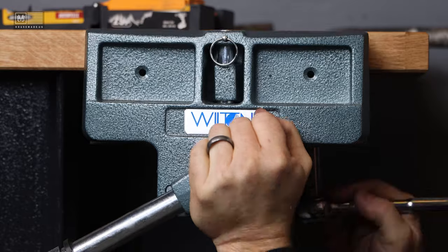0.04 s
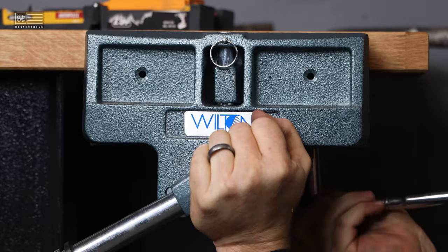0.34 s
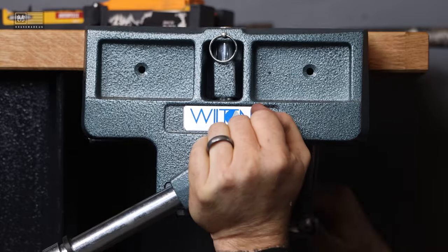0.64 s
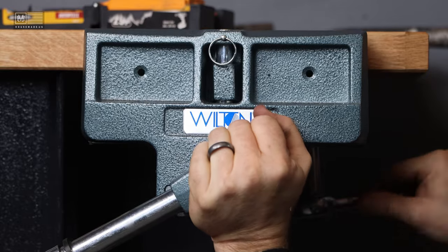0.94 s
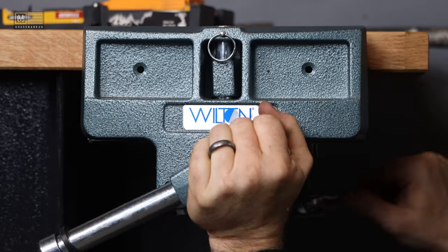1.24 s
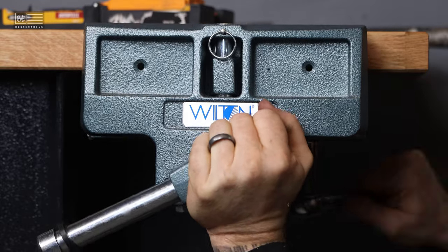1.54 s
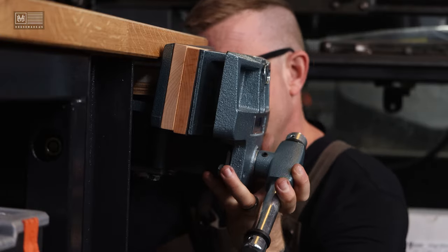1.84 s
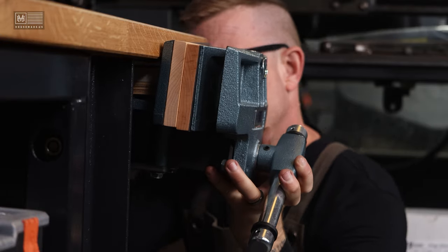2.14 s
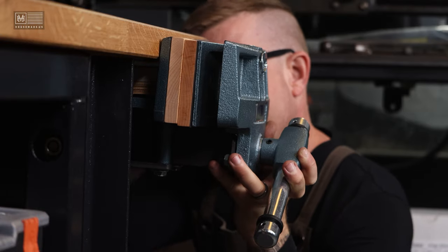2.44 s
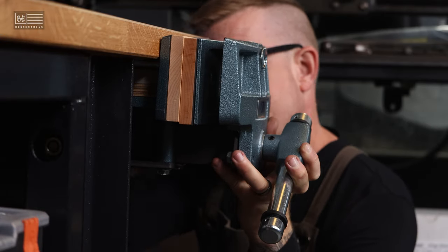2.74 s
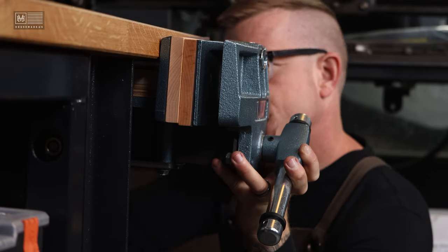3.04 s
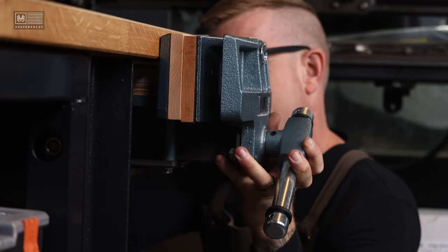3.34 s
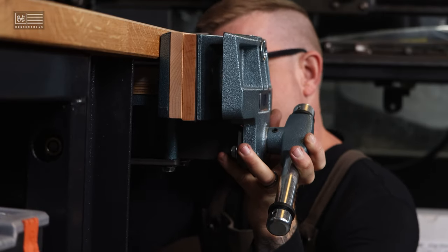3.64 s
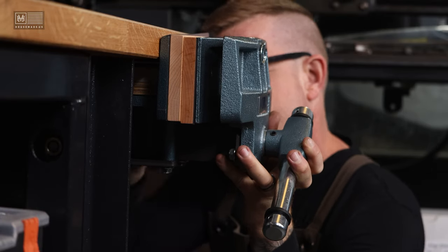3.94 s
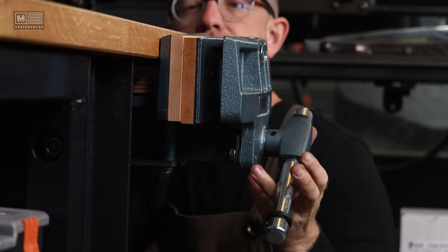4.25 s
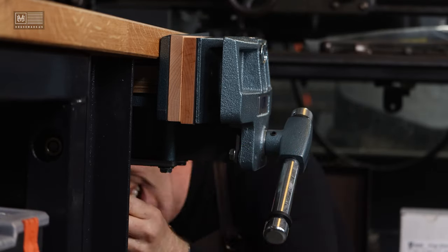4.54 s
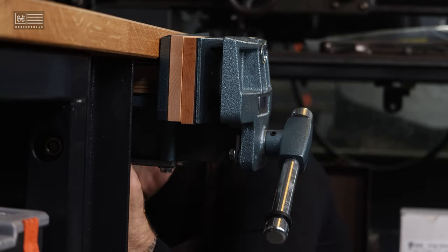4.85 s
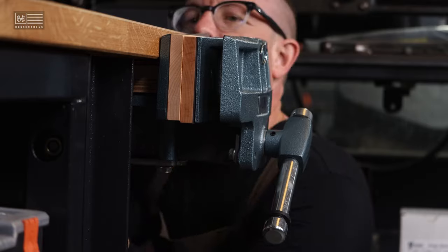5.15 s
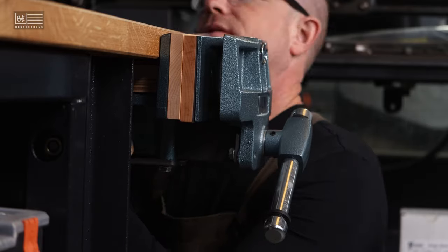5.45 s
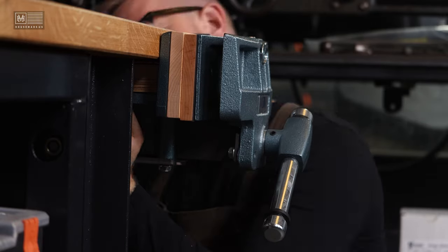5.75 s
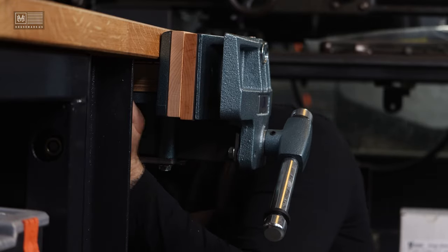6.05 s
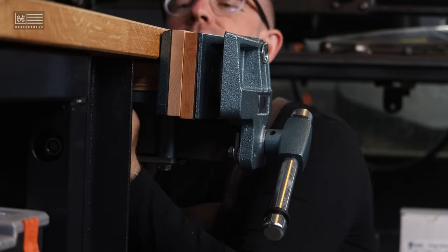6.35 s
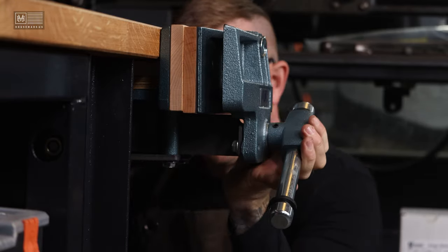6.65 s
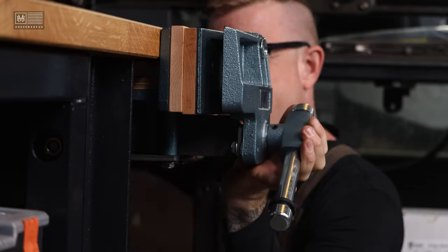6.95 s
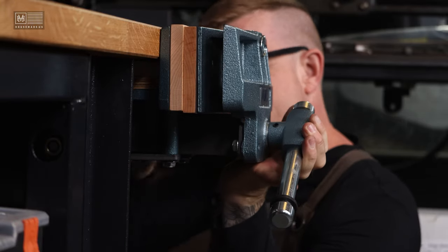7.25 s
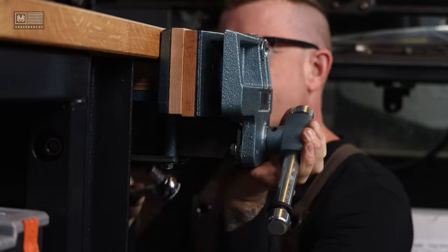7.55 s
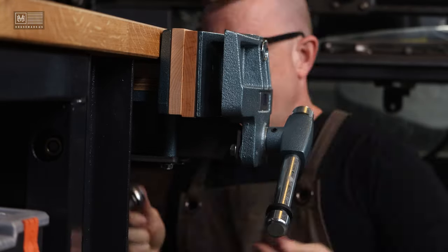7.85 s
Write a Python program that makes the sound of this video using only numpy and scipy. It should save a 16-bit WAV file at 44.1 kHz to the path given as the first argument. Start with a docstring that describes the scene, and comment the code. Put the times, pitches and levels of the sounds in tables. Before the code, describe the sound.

A ratchet wrench works on a heavy metal vise, heard close in a dry workshop with a faint, steady machine hum. A thread squeaks briefly at the very start, followed by a sharp steel knock at 0.3 seconds. Irregular clicks, short rasps and clinks continue, with a knock and light bench thump at 1.6 seconds. From about 2 to 4 seconds the ratchet runs in quick, even strokes, slightly different in tone, while loose steel rattles and rings faintly. A short lull holds a soft hand brush and a dull knock at 4.5 seconds. At about 5.1 seconds steel lets go in one bright snap with a thump, the loudest moment. Lighter ratcheting follows, with clinks near 5.7 and 6 seconds, then thins to scattered ticks. Hands and sleeves brush the iron, with a small knock near 7.9 seconds.

```python
"""A ratchet wrench bolts a heavy vise to a workbench: steel clicks and rasps in quick strokes.
The pawl ticks over its teeth, the wrench knocks on the iron, and a loose steel part rings along.
A dry thread squeaks once, hands brush the vise, jolts thump the bench, and steel lets go in one snap.
A machine hums in the room. The work is heard from the front, then the side, then under the bench."""
import sys
import numpy as np
from scipy import signal
from scipy.fft import rfft, irfft
from scipy.io import wavfile
from scipy.ndimage import uniform_filter1d

SR = 44100
rng = np.random.default_rng(int(sys.argv[2]) if len(sys.argv) > 2 else 0)


def wrap_up_sound(samples):
    """Save the sound to the file named by the first command line argument, as 16-bit audio."""
    columns = np.atleast_2d(samples).T
    # keep every value between -1 and 1, then stretch to whole-number steps
    tamed = np.clip(columns, -1, 1)
    steps = np.round(tamed * 32767).astype(np.int16)
    wavfile.write(sys.argv[1], SR, steps)


N = 357210

# wrench on iron: (time [s], bite level [dB], body [dB rel.], treble [dB rel.], length [s], mode [Hz])
WRENCH_KNOCKS = [(0.3257, -18, -12, -4, 0.0081, 3800), (0.4151, -33.5, -3, 2, 0.011, 3730),
                 (0.4367, -34, -2, 2, .007, 2700), (.4524, -32.5, -11.5, 3, 0.0058, 4200),
                 (0.9771, -25, -10, -12, 0.018, 5100), (1.1195, -25.5, -13, -15, 0.011, 5000),
                 (1.2434, -38, -3, -27, 0.0075, 3050), (1.26, -33, -7.5, -7.5, .011, 5030),
                 (1.4175, -28.5, -12, -16, 0.0066, 4700), (1.4253, -33.5, -7, 3, 0.018, 3250),
                 (1.6065, -24.5, -18.5, 4, 0.0033, 5100), (1.7001, -34, -10, -9, 0.017, 4800),
                 (1.9708, -27, -14, -9, 0.0035, 3370), (2.7322, -28.5, -15, -3, .0056, 2860),
                 (2.8084, -29, -15, 1.5, 0.0025, 2600), (2.867, -29, -23, -2.5, 0.0054, 3300),
                 (4.5438, -45, -3, -9, 0.0074, 3240), (4.7983, -35.5, -33, -2, 0.017, 5600),
                 (5.7254, -27, -19.5, -4, 0.0068, 5700), (6.0147, -43, -1.5, 6, 0.013, 5060),
                 (6.9356, -48, -5, -7.5, 0.0096, 2750), (7.8861, -34.5, -9.5, -21, 0.001, 2430)]
# pawl into a tooth: (time [s], bite level [dB], treble [dB rel.])
PAWL_TICKS = [(0.186, -38, 1.5), (0.2104, -37, 6), (0.2312, -41, 9), (.406, -40, -6), (0.4283, -37, 5),
              (0.4905, -36.5, 2), (0.6158, -37, 4), (0.6459, -40.5, 3.5), (0.6848, -41.5, 4.5),
              (0.7236, -35, 1), (0.7326, -41, 2), (0.836, -36.5, 11.5), (.864, -33, -1.5),
              (.897, -38.5, -23), (1.3104, -35, 0.5), (1.5352, -38, 0.5), (1.751, -41, 2.5),
              (1.8167, -43.5, 1.5), (1.8398, -39.5, 0.5), (2.035, -37.5, -8), (2.1078, -36, -10),
              (2.161, -36, -25), (2.2855, -42, 5.5), (2.377, -42.5, 6.5), (2.4505, -42.5, 5.5),
              (2.5352, -39.5, -1), (2.5955, -33.5, 0), (2.6356, -70, 2), (2.677, -41.5, -0.5),
              (2.7676, -38, -14), (2.888, -42, -3), (2.915, -41.5, 7.5), (2.9741, -47.5, 6.5),
              (2.9915, -43.5, 7), (3.0614, -39.5, -4.5), (3.134, -36.5, -5), (3.1611, -31, -10),
              (3.2263, -42, 3), (3.249, -38, -6), (3.342, -36.5, -4.5), (3.421, -44, 2),
              (3.504, -32.5, -4.5), (3.5975, -47.5, 4), (3.6696, -46.5, 5), (3.721, -41, 8),
              (3.7275, -37.5, 4), (3.7564, -45, 6), (3.8398, -37.5, 0), (3.9754, -34, -8),
              (4.0891, -40.5, -4.5), (4.133, -43, -0.5), (4.8496, -42.5, -5), (4.8831, -45.5, 1),
              (4.981, -48, -10), (5.182, -44.5, 1.5), (5.212, -37.5, 0), (5.2608, -44, 2),
              (5.2916, -43.5, 2), (5.3697, -45.5, 2.5), (5.7557, -38.5, 3), (5.8004, -42.5, 3),
              (5.915, -46, 2.5), (6.1236, -39, 0), (6.554, -52, -19), (6.8256, -41, 1), (6.8617, -53.5, 10),
              (6.871, -50, 5), (6.9, -47.5, 6.5), (7.0847, -47.5, -3), (7.101, -45.5, -6),
              (7.191, -44.5, 0), (7.268, -56.5, 4), (7.305, -55.5, 2.5), (7.45, -48.5, 0),
              (7.595, -46, 6.5), (7.751, -51.5, 10.5)]
PAWL_HZ = (4100, 3370, 4290)  # main mode: front, side, under the bench
SIDE_FROM_S, UNDER_FROM_S = 1.765, 4.5
BODY, BITE, TREBLE = (signal.butter(4, edges_hz, "band", fs=SR, output="sos")
                      for edges_hz in [(150, 2000), (2000, 7500), (7500, 17000)])
SWISH = signal.butter(2, 2000, "high", fs=SR, output="sos")


def amp(db):
    return 10 ** (np.asarray(db) / 20)


def unit_rms(x):
    return x / np.sqrt(np.mean(x ** 2) + 1e-20)


def seconds(length_s):
    return np.arange(round(length_s * SR)) / SR


def add(mix, at_s, sound):
    part = mix[max(round(at_s * SR), 0):][:len(sound)]
    part += sound[:len(part)]


def gain_at(spectrum, hz):
    points_hz, db = np.transpose(spectrum)
    return amp(np.interp(np.log(hz + 1), np.log(points_hz), db))


def noise(gain):
    """Unit-rms noise with spectrum gain(Hz)."""
    return unit_rms(irfft(rfft(rng.standard_normal(N)) * gain(np.fft.rfftfreq(N, 1 / SR)), N))


def wobble(t, smooth_samples):
    return unit_rms(uniform_filter1d(rng.standard_normal(len(t)), size=smooth_samples))


def coloured(x, spectrum):
    """Minimum-phase filter from (frequency [Hz], gain [dB]) points."""
    log_gain = np.log(gain_at(spectrum, abs(np.fft.fftfreq(2048, 1 / SR))))
    impulse = np.fft.ifft(np.exp(np.conj(signal.hilbert(log_gain)))).real[:512]
    return signal.fftconvolve(x, impulse)[:len(x)]


def band(x, sos, db, length_s):
    """One band of x, with the energy of level db held for length_s."""
    y = signal.sosfilt(sos, x)
    return amp(db) * y * np.sqrt(length_s * SR / (np.sum(y ** 2) + 1e-20))


def mode(x, hz, t60_s):
    """Unity-gain resonance."""
    width_hz = np.log(1000) / np.pi / t60_s
    return signal.lfilter(*signal.iirpeak(hz, hz / width_hz, fs=SR), x)


def by_position(at_s, front, side, under):
    return front if at_s < SIDE_FROM_S else side if at_s < UNDER_FROM_S else under


def steelwork(force, at_s):
    """Contact force as the steel radiates it from the current work position."""
    # steel colour per position: (frequency [Hz], gain [dB])
    front = [(150, -23.5), (400, 0.5), (900, -2.5), (1150, 1), (1500, -7.5), (2200, -1.5), (3550, 9),
             (4400, 4), (5150, 4.5), (7200, -5), (8700, -6.5), (10400, -7), (12400, 0.5), (14000, -11.5)]
    side = [(150, -24), (400, 2), (1000, -2), (1900, -12.5), (2800, 8), (3600, 13), (4700, 8), (5800, 5),
            (7500, -9), (9300, -7.5), (11500, -2.5), (13000, -8), (14700, -5), (15700, -22)]
    under = [(150, -21), (420, -9.5), (1000, -5.5), (2100, -18), (3000, -1), (3900, 4.5), (4600, -4),
             (5200, 3), (5900, 1.5), (7000, -5), (8500, -11), (10600, -1.5), (13000, -1.5), (15700, -10.5)]
    return coloured(force, by_position(at_s, front, side, under))


def contact(force, hz, main_db, main_t60_s):
    """Each contact point favours one main mode and five high ones of its own."""
    high_hz = np.exp(rng.uniform(np.log(7500), np.log(15500), 5))
    high = sum(mode(force, f, t60_s=0.035) for f in high_hz)
    return force + amp(main_db) * mode(force, hz, main_t60_s) + amp(3) * high


def glide(curve, jitter, partials=((1, 0),)):
    """Gliding tone with unsteady pitch."""
    times_s, hz, db = np.transpose(curve)
    out, t = np.zeros(N), np.arange(times_s[0], times_s[-1], 1 / SR)
    cycles = np.cumsum(np.interp(t, times_s, hz) * (1 + jitter * wobble(t, 40))) / SR
    tone = sum(amp(level_db) * np.sin(2 * np.pi * k * cycles) for k, level_db in partials)
    add(out, times_s[0], unit_rms(tone) * amp(np.interp(t, times_s, db)))
    return out


def workshop(waver_db=0.96, front_boost_db=4):
    """Room noise and machine hum; from the front, louder and hollow."""
    # room noise: (frequency [Hz], density [dB rel.])
    air = [(18, -52.5), (30, -54.5), (120, -29.5), (240, -21.5), (345, -11), (486, -9.5), (600, -8.5),
           (913, -20), (1160, -18.5), (1900, -26), (3050, -17.5), (3580, -23.5), (4530, -25.5),
           (4910, -26.5), (6050, -30), (11100, -35), (12300, -30.5), (16000, -40.5)]
    # machine tones: (frequency [Hz], level [dB], width [Hz])
    hum = [(594.3, -55.5, 0.74), (1195, -71.5, 4), (975, -76.5, 13), (4750, -66.5, 22)]
    # room resonances at the front: (centre [Hz], width [Hz], level [dB])
    resonances = [(375, 33, -61), (449, 20, -54), (560, 59, -57.5), (1150, 380, -61), (3280, 1700, -57.5)]
    front = np.clip((SIDE_FROM_S - np.arange(N) / SR) / 0.027, 0, 1)
    out = amp(-58) * noise(lambda f: gain_at(air, f))
    out += amp(-96) * noise(lambda f: 1 / (1 + (f / 90) ** 2))  # rumble
    for hz, db, width_hz in hum:
        drift, swell = (noise(lambda f: 1 / (1 + (f / 12) ** 4)) for _ in range(2))
        tone = np.sqrt(2) * np.sin(2 * np.pi * np.cumsum(hz + width_hz / 2 * drift) / SR)
        out += amp(db + waver_db * swell + front_boost_db * front) * tone
    hollow = sum(amp(db) * noise(lambda f: 1 / (1 + 2 * ((f - hz) / width_hz) ** 2) ** 0.76)
                 for hz, width_hz, db in resonances)
    return out + hollow * front


def rattle(ticks_per_s=42, floor_db=-45, spread_db=5, t60_s=0.012, resting_gain=0.15):
    """Loose parts tick faintly, louder while the wrench is in hand."""
    t = np.arange(N) / SR
    sizes = amp(floor_db + spread_db * np.minimum(rng.exponential(1, N), 3))
    hits = sizes * (rng.random(N) < ticks_per_s / SR)
    handling = np.where((t < 4.2) | ((t > 4.8) & (t < 6.5)), 1, resting_gain)
    envelope = signal.oaconvolve(hits * handling, amp(-60 * seconds(0.02) / t60_s))[:N]
    return signal.sosfilt(SWISH, steelwork(envelope * rng.standard_normal(N), UNDER_FROM_S))


def thread_squeak():
    """A dry thread squeaks over a faint low groan."""
    # glides: (time [s], pitch [Hz], level [dB])
    squeak = [(.061, 1100, -71), (.065, 1015, -36), (.078, 920, -42), (.092, 702, -40.5), (.104, 936, -38),
              (.114, 1157, -27), (.124, 1425, -26.5), (.129, 1380, -29.5), (.135, 1100, -53)]
    groan = [(0, 344, -65), (.06, 342, -55), (.12, 332, -54), (.16, 289, -55), (.2, 270, -67)]
    # squeak partials: (harmonic number, level [dB rel.])
    partials = [(1, -17.5), (2, -12.5), (3, -23), (4, -19.5), (5, -32), (6, -35)]
    return glide(squeak, jitter=0.045, partials=partials) + glide(groan, jitter=0.013)


def back_swings(teeth_per_s=75, catches_per_s=240, tooth_db=18, spread_db=9, catch_t60_s=0.013):
    """The pawl runs over the teeth in evenly paced swings; scraping adds tiny catches and hiss."""
    # stroke runs: (start [s], count, period [s], pawl duty [0-1], bite level [dB], treble [dB rel.],
    # scrape [0-1])
    runs = [(.086, 2, 0.093, 0.79, -46, 0.5, 0.75), (.394, 1, 0.1, .64, -40.5, -5, 0.6),
            (0.558, 1, 0.053, 0.46, -44.5, -19, 0.8), (.665, 1, .12, 0.66, -50, 4, 0.54),
            (0.846, 3, 0.13, 0.38, -55.5, 6, 0.28), (1.194, 2, 0.078, 0.91, -48.5, -3, 0.45),
            (1.429, 1, .1, 0.66, -48.5, -19, 0.7), (1.699, 1, 0.098, .65, -49.5, 3, 0.44),
            (1.889, 6, 0.069, 0.87, -41.5, -6.5, 0.7), (2.286, 4, 0.084, 0.83, -44.5, -5, 0.77),
            (2.602, 5, 0.066, 0.8, -42, -4, 0.46), (3.137, 3, .094, 0.41, -48.5, -4, .3),
            (3.421, 4, .089, .4, -45, -7, 0.72), (3.949, 1, 0.093, 0.34, -46, 3, .7),
            (4.085, 1, .11, 0.72, -50, -9, 0.38), (4.803, 1, 0.031, .5, -39.5, -4, .7),
            (4.824, 1, 0.11, 0.75, -49, -8, 0.36), (5.037, 5, .0845, 0.53, -49, -2.5, 0.77),
            (5.48, 2, 0.089, 0.33, -44.5, 4, 0.8), (5.651, 2, 0.089, 0.6, -49.5, 2, .7),
            (5.83, 1, .13, .7, -54, -0.5, 0.33), (6.018, 2, 0.12, 0.19, -47, 1.5, 0.5),
            (6.241, 2, 0.084, 0.38, -44, 1, 0.73), (6.403, 1, .09, .38, -52, 6, 0.5),
            (6.65, 1, .09, 0.57, -50, -4.5, 0.41), (7.086, 2, .097, 0.48, -54, -1.5, 0.3),
            (7.426, 1, 0.074, 0.36, -56, -2, 0.56)]
    swings = [(start_s + k * period_s, duty * period_s, db + rng.normal(0, 1.3), treble_db, scrape)
              for start_s, count, period_s, duty, db, treble_db, scrape in runs for k in range(count)]
    out, decay = np.zeros(N), amp(-60 * seconds(0.02) / catch_t60_s)
    for at_s, length_s, db, treble_db, scrape in swings:
        t = seconds(length_s + 0.02)
        catches = rng.random(len(t)) < scrape * catches_per_s / SR
        scatter_db = spread_db * np.minimum(rng.exponential(1, len(t)), 3)
        tooth_hz = teeth_per_s * np.exp(0.32 * wobble(t, 500))
        teeth = np.diff(np.floor(np.cumsum(tooth_hz) / SR), prepend=-1)
        hits = (teeth * amp(tooth_db - scatter_db) + catches * amp(scatter_db)) * (t < length_s)
        hiss = scrape ** 2 * np.clip(np.minimum(t, length_s - t) / 0.0028, 0, 1)
        envelope = (signal.fftconvolve(hits, decay)[:len(t)] + hiss) * amp(-4 * t / length_s)
        force = envelope * rng.standard_normal(len(t))
        hz = by_position(at_s, *PAWL_HZ) * (1 + 0.28 * rng.uniform(-1.2, 1))
        rasp = steelwork(contact(force, hz, main_db=-3.5, main_t60_s=0.003), at_s)
        for sos, rel_db in [(BODY, -20), (BITE, 0), (TREBLE, treble_db)]:
            add(out, at_s, band(rasp, sos, db + rel_db, length_s))
    return out


def loose_part(contacts, seating_db=5.5):
    """A small steel part rings in sympathy, less when held; its seating shifts at random."""
    # its modes: (frequency [Hz], gain [dB], t60 [s])
    modes = [(9910, 6.5, 0.037), (4300, -1, 0.055), (9070, -10.5, .02)]
    # freedom to ring: (time [s], gain [dB])
    freedom = [(0, 2), (1.65, 3), (1.9, -6), (3.4, -4), (3.701, -5), (4.8, 1), (5.9, 0.5), (6.4, -5),
               (7.199, -1)]
    seating = np.tanh(noise(lambda f: 1 / (1 + (f / 25) ** 4)))
    freedom_db = np.interp(np.arange(N) / SR, *np.transpose(freedom))
    drive = contacts * amp(freedom_db + seating_db * seating)
    return sum(amp(db) * mode(drive, hz, t60_s) for hz, db, t60_s in modes)


def pawl_ticks(body_db=-22, length_s=0.0049, detune=0.041):
    """Short, thin blows near the pawl's mode, as rows like WRENCH_KNOCKS."""
    return [(at_s, db, body_db, treble_db, length_s,
             by_position(at_s, *PAWL_HZ) * np.exp(rng.normal(0, detune)))
            for at_s, db, treble_db in PAWL_TICKS]


def clicks(blows, rise_s=0.00023, crack_t60_s=0.0012, tail_t60_s=0.029, body_stretch=1.94):
    """Each blow is a crack and a brief burst of dense steel modes; the low ones last longer."""
    out, t = np.zeros(N), seconds(0.06)
    crack = amp(2 - 60 * t / crack_t60_s)
    tail = amp(-24 - 60 * t / tail_t60_s)
    for at_s, db, body_db, treble_db, length_s, hz in blows:
        grit = rng.standard_normal(len(t)) * (1 - np.exp(-t / rise_s))
        force = grit * (crack + amp(-30 * t / length_s) + tail)
        high = steelwork(contact(force, hz, main_db=6.5, main_t60_s=0.0049), at_s)
        low = steelwork(grit * (amp(-30 * t / (length_s * body_stretch)) + tail), at_s)
        for x, sos, rel_db in [(low, BODY, body_db + 1), (high, BITE, 0), (high, TREBLE, treble_db)]:
            add(out, at_s, band(x, sos, db + rel_db, length_s=0.01))
    return out


def load_dip(lead_s=0.0091, depth_db=-8, hard_db=-32):
    """Ratchet gain: dips before each hard blow as the wrench takes up load."""
    t = np.arange(N) / SR
    hard_s = [at_s for at_s, db, *_ in WRENCH_KNOCKS + PAWL_TICKS if db > hard_db]
    loaded = np.any([(t > at_s - lead_s) & (t < at_s) for at_s in hard_s], axis=0)
    return amp(depth_db * uniform_filter1d(loaded.astype(float), size=60))


def hand_brushes(lumpiness=0.94):
    """Soft, lumpy friction of skin and sleeves on the iron."""
    # touches: (time [s], length [s], dull level [dB], swish level [dB])
    touches = [(1.441, 0.052, -49.5, -57), (4.228, 0.11, -75, -58.5), (5.134, 0.034, -51.5, -59),
               (5.487, 0.027, -55, -56), (5.677, .04, -59, -68), (6.258, 0.047, -62.5, -54),
               (6.442, 0.11, -60, -60), (7.045, .03, -64, -72), (7.678, 0.016, -59, -65),
               (7.758, 0.041, -55.5, -54.5), (7.789, 0.01, -46, -56), (7.87, 0.036, -46.5, -47.5),
               (7.992, 0.011, -52.5, -58.5), (8.026, 0.056, -57, -59)]
    # friction colour: (frequency [Hz], gain [dB])
    spectrum = [(60, 9), (200, -4.5), (350, 6), (700, -0.5), (1100, 2.5), (1800, -2), (3000, -3.5),
                (6000, -10.5), (15000, -13.5)]
    out = np.zeros(N)
    for at_s, length_s, dull_db, swish_db in touches:
        t = seconds(length_s + 0.01)
        pressure = np.exp(lumpiness * wobble(t, 130)) * np.sin(np.pi * np.minimum(t / length_s, 1))
        rub = coloured(rng.standard_normal(len(t)) * pressure, spectrum)
        add(out, at_s, band(rub, BODY, dull_db, length_s) + band(rub, SWISH, swish_db, length_s))
    return out


def bench_thumps():
    """Each jolt is one short push on the bench."""
    # pushes: (time [s], level [dB], width [s])
    jolts = [(1.609, -34, 0.00052), (4.547, -41, 0.00024), (5.0654, -32.5, 0.00028), (7.796, -54, 0.0004),
             (7.8854, -45, 0.0003)]
    out, t = np.zeros(N), seconds(0.02)
    for at_s, db, width_s in jolts:
        u = t / width_s
        add(out, at_s, amp(db) * u * (1 - u / 3) * np.exp(1 - u))
    return out


def whine():
    """A faint tone that sinks slowly."""
    # glide: (time [s], pitch [Hz], level [dB])
    curve = [(1.77, 722, -66), (2.4, 682, -64), (3.3, 665.5, -65), (4.5, 665.5, -67.5), (6.5, 646.6, -68),
             (8.1, 663, -75)]
    return glide(curve, jitter=0.025)


def snap():
    """Steel lets go: three contacts within a millisecond strike the same high modes."""
    # contacts: (time [s], level [dB])
    hits = [(5.0652, -17), (5.0655, -20.5), (5.0656, 3.5)]
    # struck part: (frequency [Hz], gain [dB], t60 [s])
    modes = [(10040, -1.5, 0.0037), (13380, -4.5, 0.0022), (14060, -3.5, 0.0081), (6600, -50, .001),
             (3900, -36, 0.0082), (9100, -38, 0.04)]
    out, t, start_s = np.zeros(N), seconds(0.08), hits[0][0]
    for hz, db, t60_s in modes:
        for at_s, hit_db in hits:
            age_s = t - (at_s - start_s)
            envelope = amp(db + hit_db - 60 * np.maximum(age_s, 0) / t60_s) * (age_s >= 0)
            add(out, start_s, envelope * np.sin(2 * np.pi * hz * t))
    return out


def room(x, wet_db=-21, t60_s=0.047):
    """Adds the short, faint tail of a cluttered room."""
    t = seconds(0.3)
    tail = rng.standard_normal(len(t)) * amp(-60 * t / t60_s) * (t > 0.004)
    return x + amp(wet_db) * signal.oaconvolve(x, tail / np.linalg.norm(tail))[:N]


def scene():
    """The work on the vise in its room, mono."""
    blows = clicks(WRENCH_KNOCKS + pawl_ticks())
    ratchet = (back_swings() + rattle()) * load_dip()
    ring = loose_part(blows + amp(5) * ratchet)  # a running pawl shakes it more than single blows
    squeak = thread_squeak()
    background = workshop() + whine()
    work = room(blows + ratchet + ring + squeak + hand_brushes())
    return (work + snap() + bench_thumps() + background)[None]


def record(dry, cutoff_hz=16500):
    """Full-scale clip, then low-pass."""
    lowpass = signal.firwin(255, cutoff_hz, window=("kaiser", 8), fs=SR)
    return signal.oaconvolve(np.clip(dry, -1, 1), lowpass[None], "same")


dry = scene()
out = record(dry)
wrap_up_sound(out)
```